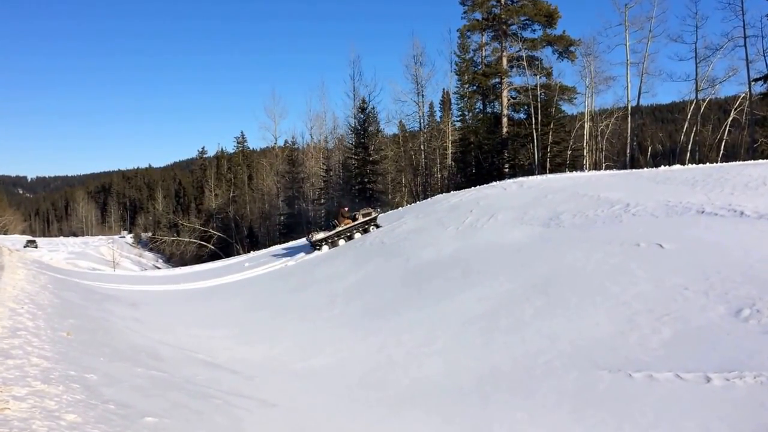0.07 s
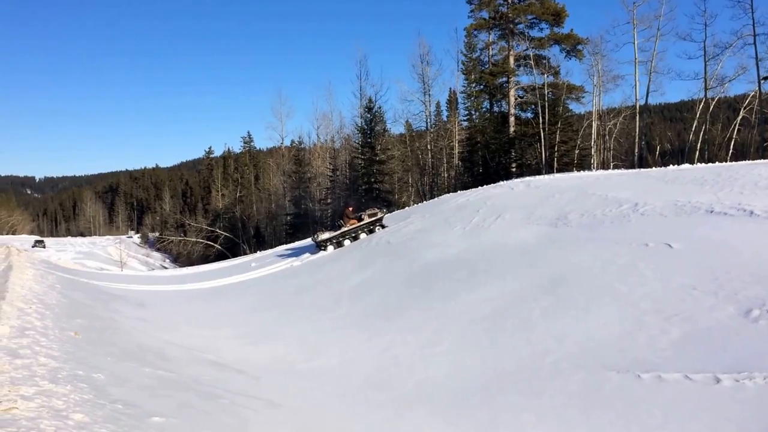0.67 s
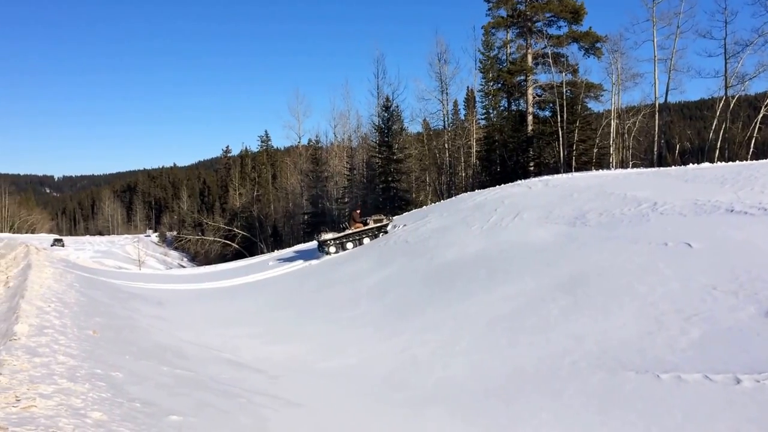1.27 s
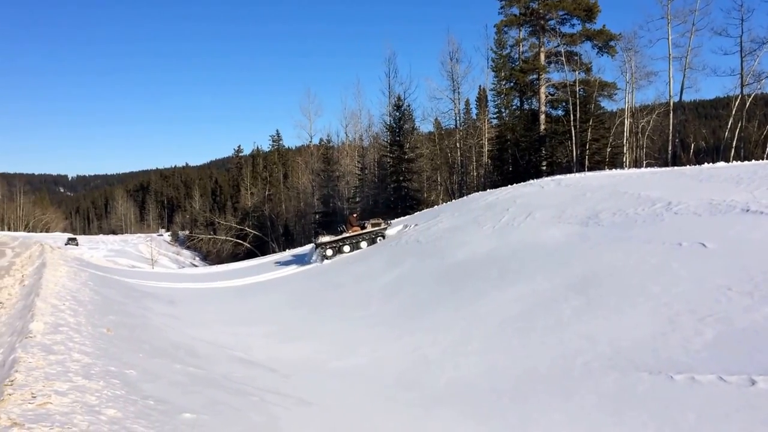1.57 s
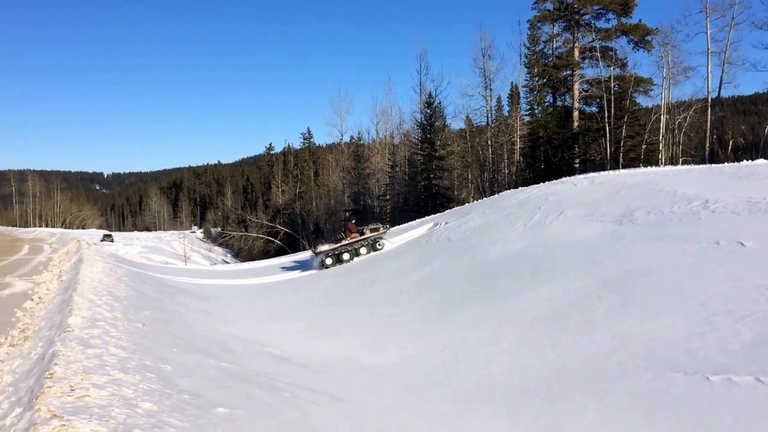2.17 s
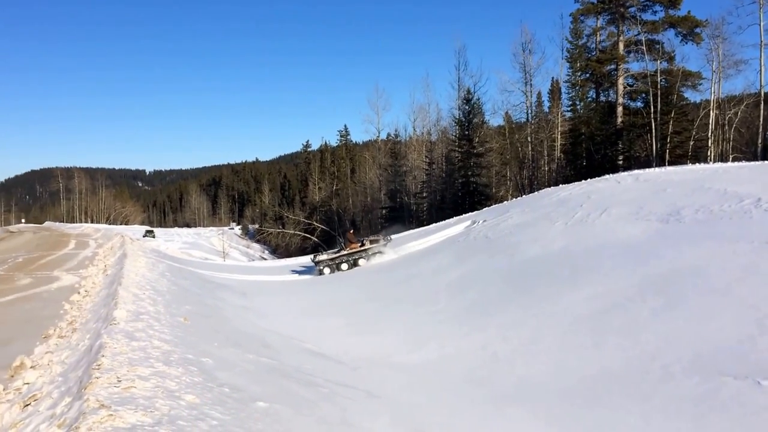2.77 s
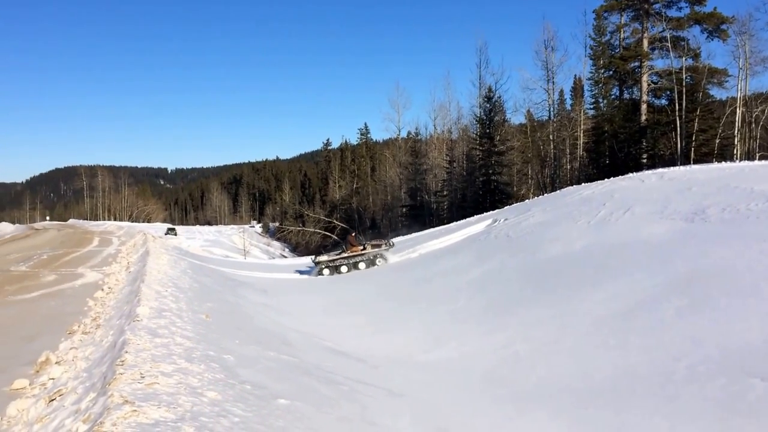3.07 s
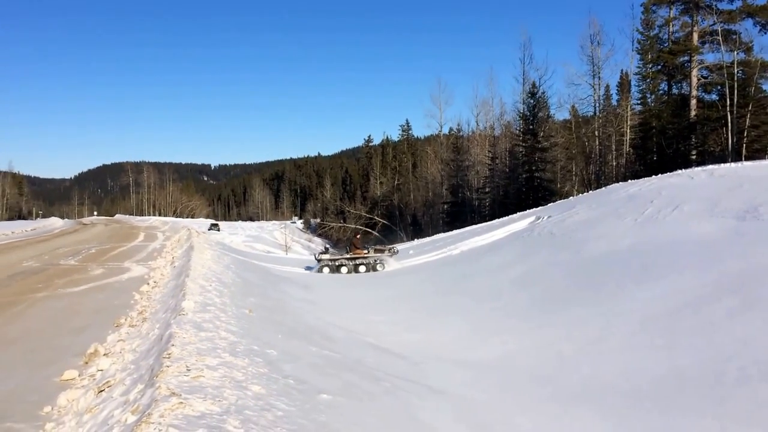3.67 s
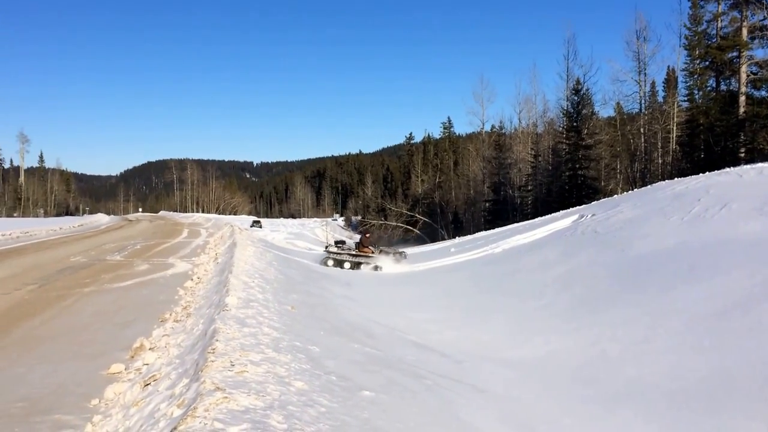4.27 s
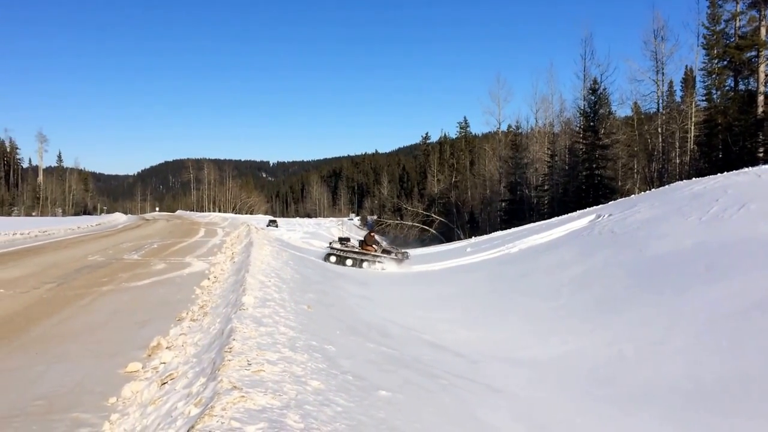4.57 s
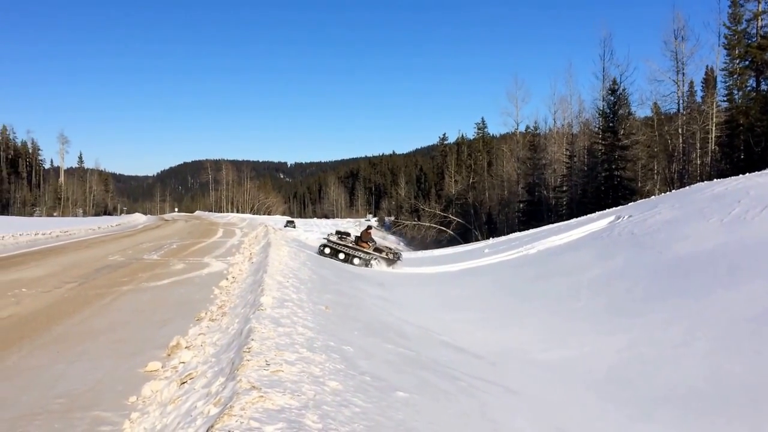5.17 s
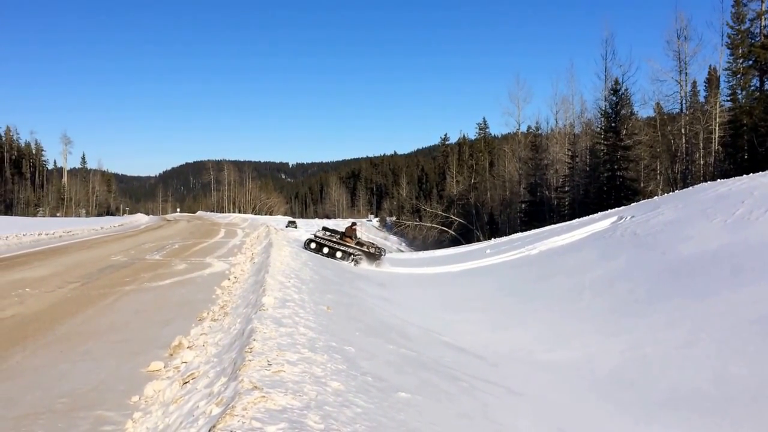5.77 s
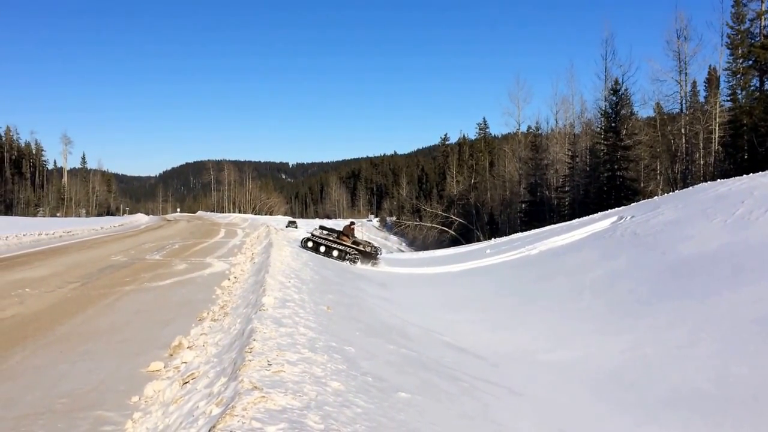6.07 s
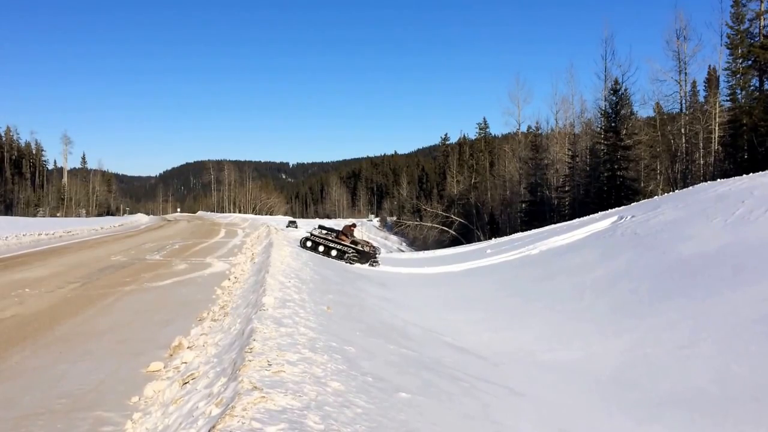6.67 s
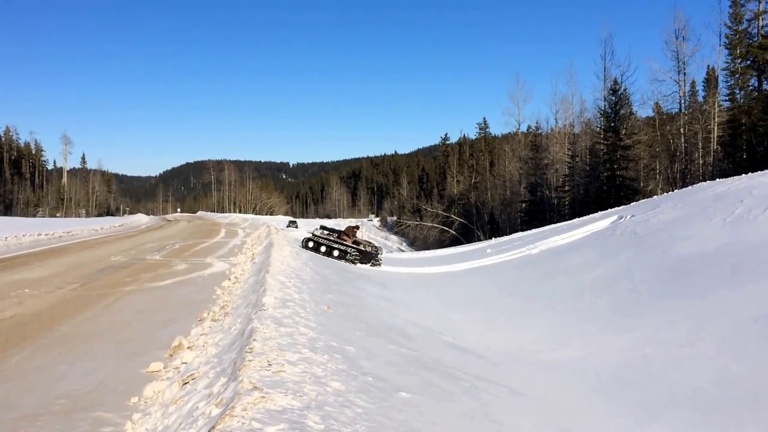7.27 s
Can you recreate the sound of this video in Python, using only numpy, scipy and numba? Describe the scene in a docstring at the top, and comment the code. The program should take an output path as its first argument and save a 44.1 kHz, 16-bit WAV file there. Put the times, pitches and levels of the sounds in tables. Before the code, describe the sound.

Wind buffets the microphone throughout, outdoors in deep snow: a close, restless low rumble broken by short thumps. Snow crust crunches softly nearby at about 0.5 seconds. From around 1 second, a small tracked vehicle is heard far behind the wind, its tracks making a flickering rush and airy hiss while the engine drones faintly, swelling and sinking with a thin whine. The strongest gust hits at about 1.5 seconds with a cluster of hard pops. Single pops follow near 3.5 and 4.3 seconds, as the distant rush carries on. Another strong run of gusts and pops comes between 5.2 and 6.2 seconds. The vehicle fades over the same stretch and is barely audible by 6.5 seconds. The wind briefly drops, then thumps again until the end at about 7.4 seconds, with a few soft, close crunches of snow.

```python
"""Deep snow in gusty wind, a small tracked vehicle crawling far from the phone.
Eddies buffet the microphone port: a restless rumble, short thumps that brighten with force, hard pops.
Behind them the rush of the tracks swells, and sweeps as it bounces off the snow; the engine drones
faintly. Crust crunches softly close by."""
import sys
import numpy as np
from scipy import signal
from scipy.fft import rfft, irfft, next_fast_len
from scipy.io import wavfile
from scipy.ndimage import uniform_filter1d, minimum_filter1d, map_coordinates
from numba import njit

SR = 44100
rng = np.random.default_rng(int(sys.argv[2]) if len(sys.argv) > 2 else 0)


def transcribe(u):
    """Save the signal u as a 16-bit wav file named by the first command-line argument.

    u: samples, shape (n,) or (channels, n), limited to [-1, 1]; the rate is SR.
    q: integer samples, one column per channel.
    """
    v = np.clip(np.atleast_2d(u).T, -1, 1)
    q = np.round(v * 32767).astype(np.int16)
    wavfile.write(sys.argv[1], SR, q)


N = 326781
TIME = np.arange(N) / SR

# wind strength: t/s, level/dB
WIND = [(0, -31.5), (.12, -38), (.2, -42), (.29, -35), (.38, -41.5), (.6, -31.5), (.97, -31), (1.12, -41.5),
        (1.55, -23.5), (2.1, -37), (2.22, -34), (2.45, -37), (2.8, -32), (2.95, -34), (3.3, -35),
        (3.5, -26), (3.62, -32.5), (3.9, -29), (4.05, -38.5), (4.3, -32), (4.48, -36.5), (4.65, -29),
        (4.87, -32.5), (5.1, -28), (5.3, -25), (5.52, -29.5), (6.35, -36), (6.5, -35), (6.63, -49.5),
        (6.77, -29.5), (6.85, -48), (6.93, -30), (7.16, -30.5), (7.23, -43), (7.3, -35), (7.41, -37)]
# microphone port response: f/Hz, gain/dB
PORT_RESPONSE = [(20, -27), (35, -15), (55, 1), (95, 3.5), (190, 1.5), (260, -3.5), (350, -3), (490, 1),
                 (620, -0.5), (770, -3.5), (1100, -4), (2200, -10.5), (2800, -15), (5000, -22)]


def undb(db):
    """Decibels to gain."""
    return 10 ** (np.asarray(db) / 20)


def unit(x):
    """Scale to rms 1."""
    return x / np.sqrt(np.mean(x ** 2) + 1e-20)


def curves(table):
    """Table columns, linearly interpolated in time."""
    s, *columns = np.transpose(table)
    return [np.interp(TIME, s, c) for c in columns]


def response(hz, points):
    """Gain of an (f/Hz, gain/dB) spectrum at hz; -20 dB/octave beyond its ends."""
    f, db = np.transpose(points)
    octave, known = np.log2(hz + 1), np.log2(f)
    outside = np.abs(octave - np.clip(octave, known.min(), known.max()))
    return undb(np.interp(octave, known, db) - 20 * outside)


def colour(x, points):
    """Filter by an (f/Hz, gain/dB) spectrum."""
    size = next_fast_len(len(x) + 4096)
    return irfft(rfft(x, size) * response(np.fft.rfftfreq(size, 1 / SR), points), size)[:len(x)]


def noise(points):
    """Coloured noise, rms 1."""
    return unit(colour(rng.standard_normal(N), points))


def walk(rate_hz):
    """Smooth random wander, rms 1."""
    step = max(int(SR / rate_hz), 2)
    ramps = np.interp(np.arange(N) / step, np.arange(N), rng.standard_normal(N))
    return unit(uniform_filter1d(ramps, step))


def resonance(hz, width_hz):
    """Band of noise, rms 1; the centre may glide."""
    phase = 2 * np.pi * np.cumsum(hz) / SR
    return walk(2 * width_hz) * np.cos(phase) + walk(2 * width_hz) * np.sin(phase)


def add(out, x, centre_s):
    """Mix x in, centred on centre_s."""
    at = int(centre_s * SR) - len(x) // 2 + np.arange(len(x))
    inside = (at >= 0) & (at < N)
    out[at[inside]] += x[inside]


@njit
def lowpass(x, hz, damping):
    """State-variable low-pass, moving corner."""
    y, band_state, low_state = np.empty(len(x)), 0., 0.
    for i in range(len(x)):
        g = np.tan(np.pi * hz[i] / SR)
        band = (band_state + g * (x[i] - low_state)) / (1 + g * (g + damping))
        y[i] = low_state + g * band
        band_state, low_state = 2 * band - band_state, 2 * y[i] - low_state
    return y


def buffets(corner_ratio=1.048, order=3.61, spread=0.43, core=0.8, edge=1.79, split_hz=330, size=8192):
    """Eddies hit the port: a few pressure swings each, little above the corner frequency."""
    # strongest eddies: centre/s, level/dB, length/s, nominal corner/Hz
    strong_eddies = [(0.006, -23.5, 0.0069, 400), (0.032, -24, 0.012, 218), (0.126, -30, 0.044, 290.0),
                     (0.288, -31.5, 0.021, 212), (0.432, -20.5, 0.015, 310), (0.486, -17.5, 0.0074, 193),
                     (0.554, -20.5, 0.017, 228), (0.592, -9.5, 0.012, 257), (0.608, -19.5, 0.016, 218),
                     (0.632, -14.5, 0.012, 220), (0.655, -16.5, 0.013, 360), (0.724, -22.5, 0.016, 250.0),
                     (0.768, -10, 0.0086, 260), (0.858, -27, 0.011, 288), (0.901, -14.5, 0.023, 231),
                     (0.96, -18.5, 0.012, 286), (0.979, -15.5, 0.018, 300), (1.174, -24, 0.032, 307),
                     (1.308, -14, 0.034, 505), (1.343, -15, 0.026, 290.0), (1.394, -13.5, 0.0078, 580),
                     (1.432, -19.5, 0.02, 300.0), (1.473, -10, 0.023, 303), (1.494, -11, 0.024, 580),
                     (1.506, -8, 0.0079, 405), (1.54, -17, 0.044, 470), (1.564, -18, 0.0096, 585),
                     (1.579, -7, 0.0088, 610), (1.599, -9, 0.02, 684), (1.628, -15, 0.011, 816),
                     (1.645, -10.5, 0.0064, 520), (1.682, -17, 0.022, 447), (1.731, -23, 0.016, 490),
                     (1.769, -19.5, 0.012, 520), (1.801, -14, 0.0063, 237), (1.907, -21.5, 0.02, 360.0),
                     (1.961, -18.5, 0.017, 510), (2.181, -15.5, 0.019, 440), (2.216, -18.5, 0.021, 222),
                     (2.276, -15, 0.04, 392), (2.351, -26, 0.011, 400), (2.472, -32, 0.015, 480),
                     (2.546, -27.5, 0.013, 322), (2.64, -28, 0.041, 393), (2.744, -18.5, 0.019, 296),
                     (2.825, -19.5, 0.015, 320.0), (2.864, -20.5, 0.015, 450), (3.093, -23, 0.035, 260.0),
                     (3.2, -18, 0.024, 328), (3.304, -24, 0.013, 322), (3.357, -23.5, 0.038, 300.0),
                     (3.391, -29, 0.023, 553), (3.465, -15.5, 0.012, 230), (3.48, -13, 0.022, 615),
                     (3.504, -13.5, 0.02, 446), (3.535, -18.5, 0.016, 272), (3.551, -21.5, 0.009, 460),
                     (3.781, -19, 0.013, 296), (3.841, -15.5, 0.012, 320.0), (3.877, -16, 0.016, 600),
                     (3.897, -12, 0.012, 400), (3.96, -26, 0.02, 390.0), (4.101, -24.5, 0.016, 238),
                     (4.21, -23.5, 0.017, 420.0), (4.333, -15.5, 0.03, 380), (4.376, -19, 0.023, 450.0),
                     (4.571, -21, 0.019, 272), (4.637, -29.5, 0.035, 420.0), (4.693, -26, 0.013, 312),
                     (4.76, -16, 0.024, 340.0), (4.815, -15.5, 0.014, 450.0), (4.99, -27, 0.017, 476),
                     (5.076, -18, 0.021, 546), (5.119, -21, 0.017, 360.0), (5.161, -12, 0.01, 440),
                     (5.217, -11.5, 0.021, 448), (5.237, -12.5, 0.019, 533), (5.282, -18, 0.021, 685),
                     (5.307, -11, 0.022, 443), (5.338, -12.5, 0.019, 338), (5.358, -16.5, 0.024, 670),
                     (5.387, -23.5, 0.031, 655), (5.488, -25, 0.012, 610), (5.59, -22, 0.015, 351),
                     (5.621, -23, 0.01, 270.0), (5.681, -14.5, 0.015, 513), (5.699, -9.5, 0.019, 517),
                     (5.756, -12, 0.0057, 560), (5.813, -20.0, 0.016, 310.0), (5.853, -16, 0.016, 346),
                     (5.884, -15, 0.038, 670), (5.914, -15, 0.012, 585), (6.062, -32, 0.0082, 580),
                     (6.18, -13, 0.025, 533), (6.238, -24, 0.032, 467), (6.434, -32.5, 0.023, 219),
                     (6.717, -25.5, 0.0071, 308), (6.795, -17.5, 0.0044, 317), (6.905, -16, 0.02, 270.0),
                     (7.041, -22, 0.019, 300.0), (7.107, -18.5, 0.014, 240.0), (7.165, -12.5, 0.0093, 283),
                     (7.186, -20.5, 0.02, 301), (7.275, -17, 0.02, 390), (7.298, -17.5, 0.0079, 410.0),
                     (7.327, -20.0, 0.017, 300.0)]
    out = np.zeros(N)
    t, hz = (np.arange(size) - size // 2) / SR, np.fft.rfftfreq(size, 1 / SR)
    port = response(hz, PORT_RESPONSE)
    fast_share = 1 / (1 + (split_hz / (hz + 1)) ** 4)
    for s, db, length_s, corner_hz in [*strong_eddies, *lesser_eddies()]:
        swirl = rng.standard_normal(size)
        # slow swirls fill the eddy, fast ones crowd its core
        whole = rfft(swirl * np.exp(-.5 * np.abs(t / (spread * length_s)) ** edge))
        centre = rfft(swirl * np.exp(-.5 * np.abs(t / (spread * length_s * core)) ** edge))
        spectrum = (1 - fast_share) * whole + fast_share * centre
        spectrum /= np.sqrt(uniform_filter1d(np.abs(spectrum) ** 2, size=19) + 1e-12)  # whiten
        rolloff = np.sqrt(1 + (hz / (corner_ratio * corner_hz)) ** (2 * order))
        thump = irfft(spectrum * port / rolloff)
        add(out, thump * undb(db - 0.26) * np.sqrt(length_s * SR / np.sum(thump ** 2)), s)
    return out


def lesser_eddies(count=120, per_s=9, length_s=0.014, over_wind_db=1.5, scatter_db=3, ceiling_db=-27,
                  ceiling_corner_hz=387, octaves_per_db=0.3):
    """Rows for buffets(): small, unevenly spaced eddies, louder and brighter in stronger wind."""
    gap, strength, stretch, tone = rng.random((count, 4)).T * 2 - 1
    s = np.cumsum(1 + .5 * gap) / per_s
    wind_db = np.interp(s, *np.transpose(WIND))
    db = np.minimum(wind_db + over_wind_db + scatter_db * strength, ceiling_db)
    corner_hz = ceiling_corner_hz * 2 ** (octaves_per_db * (db - ceiling_db) + .5 * tone)
    return np.column_stack([s, db, length_s * 2 ** (.5 * stretch), corner_hz])[s < TIME[-1]]


def rumble(corner_hz=195, ref_db=-30, octaves_per_db=0.16, surge_db=2, flutter_db=9, damping=1.48):
    """Turbulence over the port: stronger wind sheds smaller eddies, so it is louder and brighter."""
    db = curves(WIND)[0] + surge_db * np.tanh(walk(11))
    db += flutter_db * np.tanh(walk(80) / 2)
    hz = np.clip(corner_hz * 2 ** (octaves_per_db * (db - ref_db)), 60, 500)
    air = lowpass(lowpass(noise(PORT_RESPONSE), hz, damping), 2 * hz, damping)
    air /= np.sqrt(uniform_filter1d(air ** 2, SR // 25) + 1e-12)  # rms 1 over 40 ms
    return air * undb(db - 2.5)


def steepen(x, lead_s=0.00033, ramp_s=0.00079):
    """Strong pressure swings lean into steep fronts: the hardest eddies tear and crackle."""
    advance_s = lead_s * np.tanh(uniform_filter1d(x, int(ramp_s * SR)))
    torn = map_coordinates(x, [(TIME + advance_s) * SR], mode="mirror")
    return colour(torn, [(20, 0.5), (2400, -0.5), (3000, -3), (4000, -33)])


def pops(recoil_s=0.00071, ring_s=0.002, ring_db=-4, thump_hz=105, thump_s=0.012, size=4096):
    """Pressure snaps across; the port rings briefly and swings back in a low thump."""
    # slaps of air: t/s, peak/dB, snap/s, ring/Hz, thump/dB re peak
    slaps = [(.742, -12, 0.00067, 414, -13), (1.448, -5, 0.00035, 540, -1), (1.498, -12.5, 0.0001, 594, 0),
             (1.579, -7, 0.000049, 560, -4), (1.599, -3, 0.00032, 490, -12),
             (1.645, -9, 0.00028, 524, -2.5), (1.73, -9, .0001, 635, -6), (2.175, -17, 0.0024, 480, 4),
             (3.483, -7, 0.000095, 920, -22), (4.326, -4.5, 0.00013, 950, 4),
             (5.193, -6, 0.00043, 564, -24), (5.242, -9.5, 0.00024, 584, -12),
             (5.279, -7.5, 0.00036, 770, -2), (5.316, -7.5, 0.00025, 815, -8),
             (5.354, -8, 0.00047, 580, -26), (5.644, -5, 0.00049, 595, -10),
             (5.912, -4.5, .0006, 544, -1.5), (6.172, -8, 0.001, 616, -17)]
    snap_colour = [(150, 7.5), (500, -6.5), (1300, 5), (2000, 6), (2700, -1.5), (3300, -18), (4200, -58)]
    out, t = np.zeros(N), (np.arange(size) - size // 2) / SR
    after_s = np.maximum(t, 0)
    thump = np.sin(2 * np.pi * thump_hz * after_s)
    thump *= np.exp(-after_s / thump_s) * np.tanh(after_s / ring_s) ** 2
    for s, db, snap_s, ring_hz, thump_db in slaps:
        snap = colour(np.tanh(t / snap_s) * np.exp(-(t / recoil_s) ** 2), snap_colour)
        ring = np.sin(2 * np.pi * ring_hz * t) / np.cosh(2 * t / ring_s)
        slap = snap / np.abs(snap).max() + undb(ring_db) * ring
        add(out, (undb(thump_db) * thump - slap / np.abs(slap).max()) * undb(db), s)
    return out


def track_rush(body_db=-1.4, roar_db=-2, hiss_db=-10, hiss_growth=1.29, flicker_db=1.6):
    """Far rush and hiss of the tracks: swells, fades, flickers in the moving air."""
    # rush strength: t/s, level/dB
    swells = [(0, -62), (.15, -63.5), (.55, -53.5), (1.05, -49), (1.28, -42.5), (1.55, -45.5),
              (1.85, -47.5), (2.23, -44), (2.5, -50.5), (2.68, -43.5), (3.1, -44.5), (3.5, -47),
              (4.22, -44.5), (4.42, -49.5), (5.15, -46), (6.47, -62.5), (6.75, -59.5), (7.41, -60)]
    # low, middle and high bands: f/Hz, gain/dB
    roar_colour = [(120, -30), (300, -5), (500, -2), (690, -6), (790, -11), (1000, -31)]
    body_colour = [(600, -4), (780, 2.5), (900, 2), (1100, 4), (1350, 2.5), (1850, -0.5), (2050, -5.5),
                   (2400, -5.5), (2650, -15.5)]
    hiss_colour = [(2200, -39), (2400, -27), (2650, -17), (2800, -4.5), (2980, -4.5), (3150, 1.5),
                   (4100, -1.5), (4600, -3.5), (5200, -12), (6000, -33)]
    swell_db, = curves(swells)
    hiss_swell_db = swell_db.mean() + hiss_growth * (swell_db - swell_db.mean())
    body = undb(body_db) * noise(body_colour)
    roar = undb(roar_db + flicker_db * walk(12)) * noise(roar_colour)
    hiss = undb(hiss_swell_db + hiss_db) * noise(hiss_colour)
    return (body + roar) * undb(swell_db + flicker_db * walk(22.04)) + hiss * undb(flicker_db * walk(45))


def snow_bounce(x):
    """Direct sound plus its bounce off the snow: a comb that sweeps up as the lag shrinks."""
    # bounce path, shortening as the vehicle comes downhill: t/s, lag/ms, level/dB
    path = [(0, 2.3, -23), (1.1, 2.14, -22), (1.7, 1.73, -11), (2, 1.9, -10), (2.4, 1.68, -22),
            (2.7, 1.6, -5), (2.9, 1.44, -14), (3.15, 1.23, -16), (3.6, 1.02, -22), (4.1, 0.97, -16),
            (4.7, 0.77, -25), (7.41, 0.96, -29)]
    lag_ms, db = curves(path)
    bounced = map_coordinates(x, [(TIME - lag_ms / 1000) * SR], mode="mirror")
    return (x + undb(db) * bounced) / np.sqrt(1 + undb(db) ** 2)


def engine(jitter=0.00605, imbalance=.35, uneven_db=2):
    """Two unequal cylinders fire into the exhaust; drive and running gear sing unsteadily above."""
    # firing: t/s, rate/Hz, level/dB
    firing = [(0, 55, -66), (1.2, 56.4, -38), (2.2, 58.43, -62), (2.7, 59.3, -35.5), (3.3, 57.5, -51),
              (4.3, 55.85, -37), (5.5, 54.46, -36.5), (6.4, 54.7, -58), (7.4, 53.35, -53)]
    # exhaust pipe and body: f/Hz, gain/dB
    exhaust = [(40, -19), (70, 5.5), (115, 4.5), (200, -10), (330, -9.5), (520, -11.5), (700, -11),
               (850, -23), (1150, -25), (2000, -39), (4000, -69)]
    # drive whine, running-gear drone: t/s, f/Hz, level/dB
    whine = [(0, 1104, -73), (1, 1097, -55.5), (1.9, 1113, -60), (2.6, 1127, -77), (3.1, 1204, -53),
             (3.6, 1173, -67), (4.4, 1249, -53.5), (6.2, 1418, -73), (7.4, 1410, -75)]
    drone = [(1.2, 690, -100), (1.9, 680, -52), (2.5, 696, -53), (2.9, 713, -49), (3.3, 695, -53),
             (4.2, 691.4, -51), (4.8, 683, -63), (5.6, 683, -98)]
    firing_hz, firing_db = curves(firing)
    cycles = np.cumsum(firing_hz * (1 + jitter * walk(14))) / SR
    fired = np.diff(np.floor(cycles), prepend=0)
    pulses = fired * (1 + imbalance * np.cos(np.pi * cycles)) * undb(uneven_db * walk(55))
    out = unit(colour(pulses, exhaust)) * undb(firing_db)
    for table, trim_db, width_hz in ((whine, -1, 22), (drone, 0, 60)):
        hz, db = curves(table)
        out += resonance(hz, width_hz) * undb(db + trim_db)
    return out


def gliding_bands(middle_width_hz=320, high_width_hz=210, fading_db=2):
    """Two broad bands of noise, one middle and one high, glide and fade within the rush."""
    # middle and high noise bands: t/s, f/Hz, level/dB
    middle_band = [(0, 2700, -86), (.5, 2770, -71), (1.12, 2810, -60), (1.35, 2370, -75), (2.1, 1780, -63),
                   (2.7, 1860, -54), (3.25, 1520, -61), (3.75, 1656, -70), (4.35, 1303, -55.5),
                   (4.75, 1500, -55), (5.1, 1836, -53.5), (5.6, 1876, -82), (7.41, 1970, -68)]
    high_band = [(1.2, 3930, -92), (1.7, 4000, -64), (2.05, 4080, -58), (2.2, 3710, -57), (2.35, 3780, -58),
                 (2.5, 3900, -69), (2.63, 4030, -54), (2.8, 3780, -61), (2.95, 3880, -55),
                 (3.15, 4060, -62), (3.7, 4320, -74), (4.3, 4320, -100)]
    out = np.zeros(N)
    for table, width_hz in ((middle_band, middle_width_hz), (high_band, high_width_hz)):
        hz, db = curves(table)
        out += resonance(hz, width_hz) * undb(db + fading_db * walk(25.04))
    return out


def airy_hiss(trim_db=1.1, flicker_db=1.2):
    """Soft, very high hiss in smooth swells."""
    # hiss spectrum: f/Hz, gain/dB
    air_colour = [(4400, -26), (5200, -3), (6300, 1), (8000, -2.5), (10500, -4), (12000, -7.5), (15300, -8)]
    # hiss strength: t/s, level/dB
    swells = [(.04, -74.5), (.34, -71), (.56, -62.5), (.88, -65), (1.23, -56), (1.28, -52.5), (1.53, -61),
              (2.02, -58), (2.22, -52.5), (2.38, -60), (2.56, -60), (2.59, -54.5), (2.94, -54.5),
              (3.48, -59.5), (3.58, -57), (4.09, -60), (4.23, -55.5), (4.38, -62), (4.9, -59.5),
              (5.17, -61), (5.54, -67), (5.65, -63), (6.03, -69.5), (6.5, -75), (7.3, -72.5)]
    return noise(air_colour) * undb(curves(swells)[0] + trim_db + flicker_db * walk(50))


def snow_crunch(grains_per_s=2000, scatter_db=6, clump_db=4, rise_s=0.0016, tick_db=-2.5, size=8192):
    """Crust breaks in clumps of tiny grains, with a few sharper ticks."""
    # crunch strength: t/s, level/dB
    strength = [(0, -82), (.3, -75), (.55, -61), (1.1, -73), (6.3, -67.5), (6.48, -78), (6.75, -65),
                (7.41, -64.5)]
    # sharper ticks: t/s, peak/dB, decay/s
    ticks = [(.388, -49, 0.01), (.421, -47, .016), (.55, -51, 0.022), (6.687, -44, .004),
             (6.718, -46, .004), (6.984, -43, .008), (7.26, -47, 0.0052)]
    # breaking crust: f/Hz, gain/dB
    crust_colour = [(1200, -6), (2600, -2.5), (3300, 4.5), (4300, 4), (5200, -8), (7000, -4.5),
                    (11000, -11), (15000, -10)]
    breaks = rng.random(N) < grains_per_s / SR
    grains = breaks * rng.standard_normal(N) * undb(scatter_db * rng.random(N))
    clumps = undb(clump_db * np.clip(walk(45), -2, 1))
    out = unit(colour(grains * clumps, crust_colour)) * undb(curves(strength)[0])
    t = (np.arange(size) - size // 2) / SR
    for s, db, decay_s in ticks:
        envelope = np.exp(-np.maximum(t / decay_s, -t / rise_s))
        tick = colour(rng.standard_normal(size) * envelope, crust_colour)
        add(out, tick / np.abs(tick).max() * undb(db + tick_db), s)
    return out


def whistle(hz=13430, width_hz=170, trim_db=-5, flutter_db=2.5):
    """Thin, high, fluttering whistle that comes and goes."""
    # whistle bursts: centre/s, level/dB, length/s
    bursts = [(2.04, -60, .05), (2.21, -54.5, .09), (2.66, -53, .04), (2.82, -57, .092), (4.285, -58, .03),
              (4.99, -65, .05)]
    gate = sum(undb(db) * np.exp(-2 * ((TIME - s) / length_s) ** 2) for s, db, length_s in bursts)
    return resonance(np.full(N, hz), width_hz) * gate * undb(trim_db + flutter_db * walk(90))


def scene():
    """Wind on the port in front of the far vehicle; mono."""
    wind = steepen(rumble() + buffets()) + pops()
    rush = snow_bounce(track_rush())
    return (wind + rush + airy_hiss() + engine() + gliding_bands() + whistle() + snow_crunch())[None]


def record(dry):
    """Phone: peak limiter, then a steep low-pass."""
    ceiling, hold_samples, top_hz = .95, int(.004 * SR), 15350
    gain = minimum_filter1d(ceiling / np.maximum(np.abs(dry), ceiling), 2 * hold_samples)
    gain = uniform_filter1d(uniform_filter1d(gain, hold_samples), hold_samples)
    return signal.sosfilt(signal.ellip(10, .2, 70, top_hz, fs=SR, output="sos"), dry * gain)


dry = scene()
out = record(dry)
transcribe(out)
```